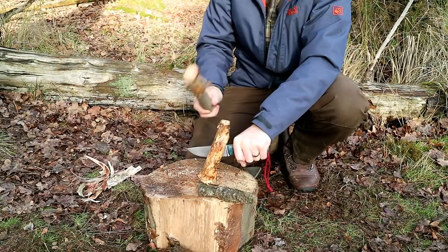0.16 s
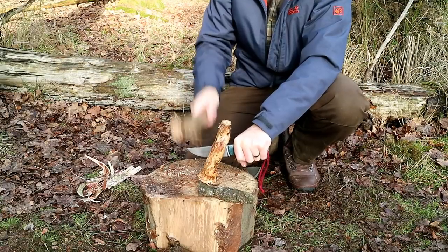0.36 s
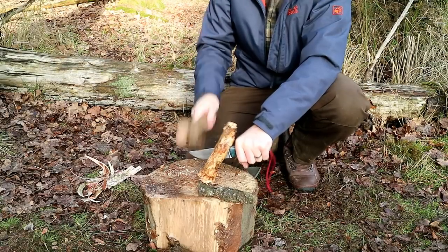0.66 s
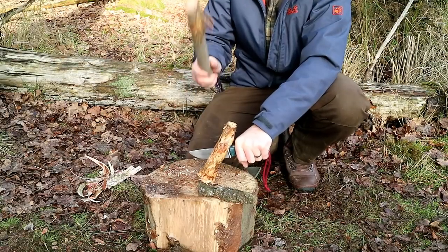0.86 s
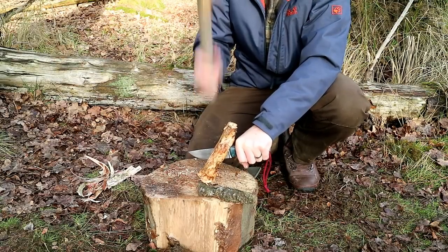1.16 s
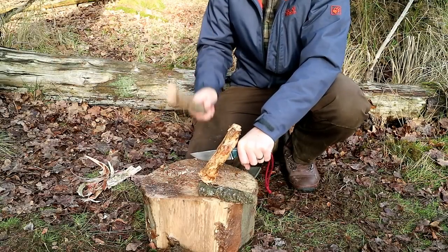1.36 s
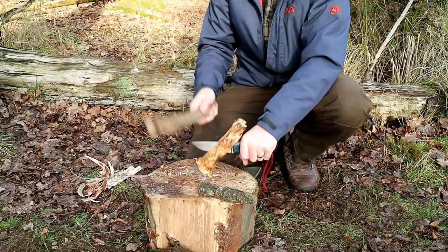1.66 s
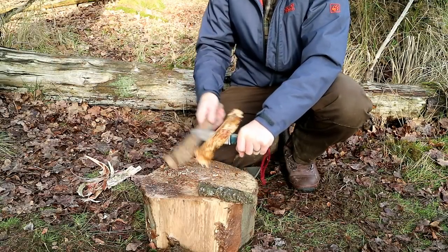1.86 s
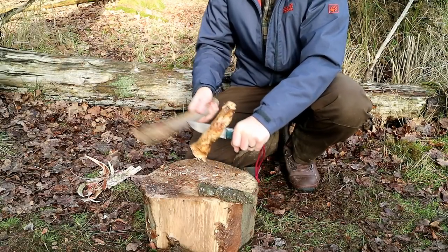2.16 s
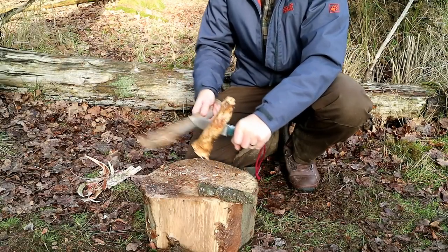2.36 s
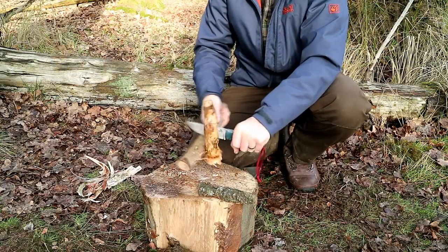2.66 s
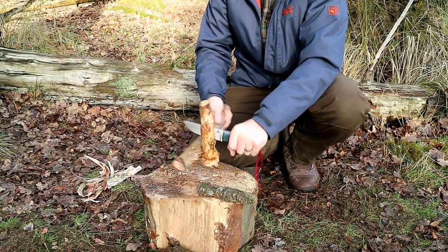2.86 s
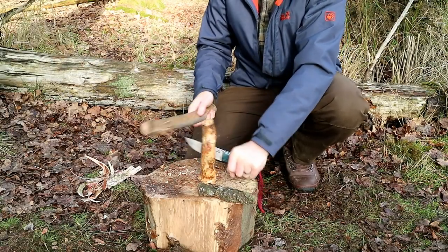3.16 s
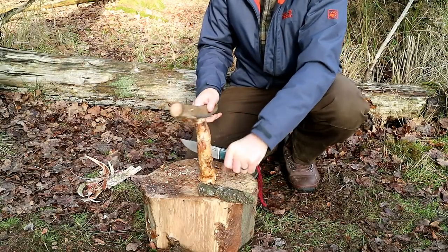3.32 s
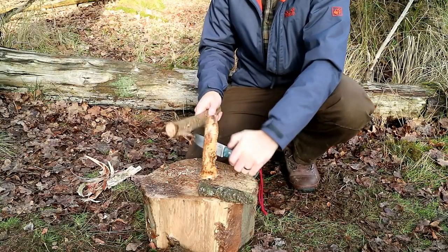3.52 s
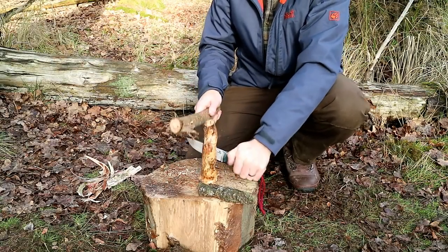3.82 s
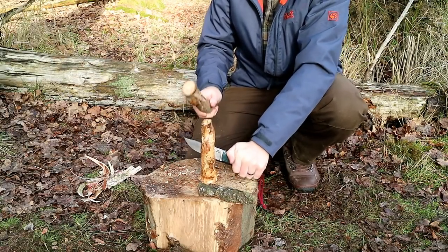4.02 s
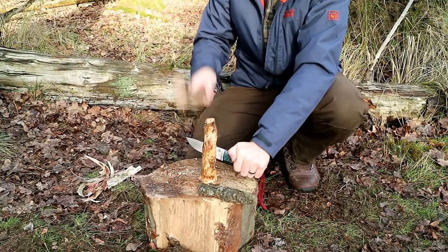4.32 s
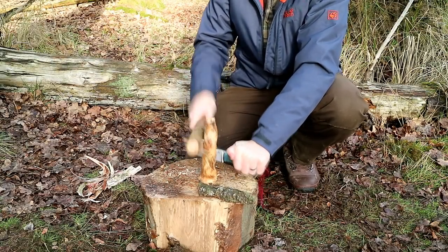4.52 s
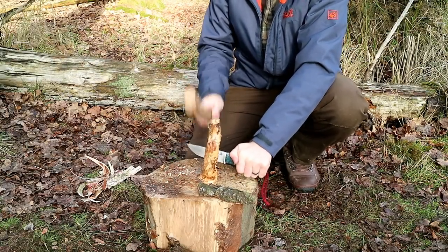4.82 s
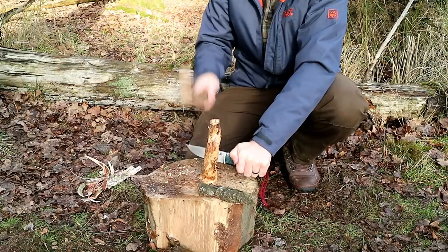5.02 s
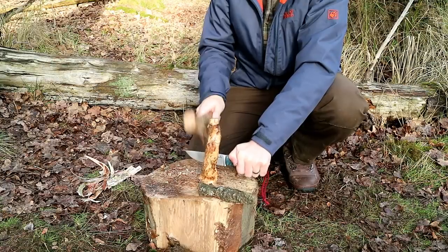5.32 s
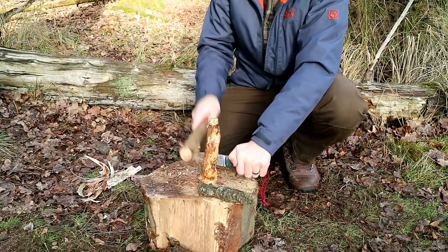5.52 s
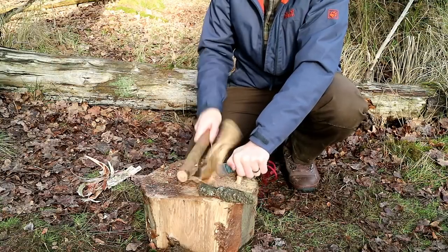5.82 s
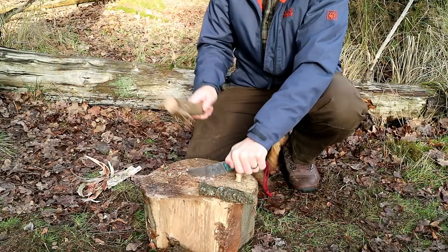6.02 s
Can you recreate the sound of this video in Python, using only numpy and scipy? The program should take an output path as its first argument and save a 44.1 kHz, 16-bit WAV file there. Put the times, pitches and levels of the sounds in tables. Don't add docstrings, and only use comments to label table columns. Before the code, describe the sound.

Firm wood-on-steel knocks with sharp cracks and short dull echoes from the trees give way to soft, rapid taps. Dry ticks and nylon rubbing fill a short pause, then the loudest knocks return, slightly clipped, ending with splintering bits. Recorded closely outdoors, nearly centred, with distant traffic rising between blows.

```python
import sys
import numpy as np
from scipy import signal
from scipy.fft import rfft, irfft, next_fast_len
from scipy.io import wavfile
from scipy.ndimage import uniform_filter1d

SR = 44100
rng = np.random.default_rng(int(sys.argv[2]) if len(sys.argv) > 2 else 0)


def invert_db(x):
    u = np.asarray(x, float) / 20
    return 10 ** u


def wav_out(sig):
    wavfile.write(sys.argv[1], SR, np.round(np.clip(np.atleast_2d(sig).T, -1, 1) * 32767).astype(np.int16))


N = 272526

# t/s, level/dB
GAIN = [(0.0, -47.5), (0.17, -51.5), (0.6, -49), (0.76, -53), (1.86, -53), (2.74, -43), (2.96, -43),
        (3.74, -34.5), (4.08, -35.5), (4.25, -38), (4.54, -37.5), (4.7, -43), (4.92, -47), (5.18, -41.5),
        (5.37, -48.5), (5.83, -47.5), (5.99, -54), (6.18, -51.5)]
FOLLOW_SLOPE = [1, 1.03, 1.1, .95]
FOLLOW_HZ = [300, 750, 2300, 5500]
# f/Hz, density/dB
ROAR = [(15, -49), (25, -21), (60, -13), (97, -15.5), (189, -15.5), (229, -9), (262, -11.5), (294, -12),
        (376, -10.5), (562, -9.5), (630, -6), (856, -2.5), (1160, -6.5), (1770, -21.5), (2400, -26.5),
        (3120, -52), (5280, -120)]
# f/Hz, density/dB
HISS = [(1530, -30), (2600, -1), (3030, -1.5), (3190, -1), (3660, -2.5), (4530, -4), (6780, -9.5),
        (8380, -2), (9540, -16.5), (12700, -6.5), (15200, -12.5), (16000, -20.5)]
# middle t/s, length/s, f/Hz, level/dB
ENGINE = [(.55, .5, 300, -56.5), (1.002, .7, 292.6, -53), (2.01, .35, 296, -60), (2.3, 0.63, 240, -53.5),
          (2.756, .3, 237.6, -59), (3.105, 0.65, 295.2, -48), (3.27, 0.37, 241, -53),
          (3.645, 0.44, 299.7, -62), (4.126, 0.455, 295.5, -53.5), (4.156, 0.56, 240.6, -54.5),
          (4.51, 0.6, 238, -57.5), (4.606, 0.22, 296, -56), (5.2, .35, 296, -59), (5.224, 0.26, 237, -64.5)]
# f/Hz, level/dB
DRONE = [(296, -65.5), (240, -70.5), (180, -74)]
# middle t/s, length/s, swish level/dB, rub level/dB
SLEEVE = [(0, .16, -61, -74), (.3, .25, -89, -65.5), (0.572, .34, -64, -61), (1.08, .16, -80, -62),
          (1.32, .28, -58, -70.5), (1.745, .25, -72, -63), (1.9, 0.16, -56.5, -75),
          (3.16, 0.32, -55.5, -72), (3.375, 0.56, -62.5, -57.5), (4.18, 0.37, -68, -56.5),
          (4.497, 0.69, -74, -60), (4.62, 0.11, -55, -63), (5.23, 0.58, -66, -75.5),
          (5.943, 0.32, -53, -71.5), (6.15, 0.11, -54, -75)]
BLOW_S = [0.0941, 0.4044, 0.7094, 1.3414, 1.9494, 2.1674, 2.3614, 2.5425, 2.7446, 2.9521, 3.1990, 4.2576,
          4.2708, 4.6782, 5.0129, 5.3310, 5.6232, 5.9178, 5.9315, 6.0965]
HOLD = [.9, 1.55, 1.05, .75, 0.81, 0.64, 1.24, 0.51, .75, 0.93, 1.3, 0.75, 1.1, .9, 0.72, 1.4, 0.91, .9,
        1.2, 1.1]
# peak level/dB, main f/Hz, upper f/Hz, upper re main/dB
WOOD = [(-8, 950, 1200, 3), (-10.5, 1277, 4720, -10.5), (9.5, 1638, 2529, -.5), (3.5, 1628, 2544, -7),
        (-24, 2300, 2480, 2.5), (-22.5, 2230, 3960, 14), (-25.5, 2350, 3540, 9.5), (-27, 2500, 3570, 3),
        (-21.5, 1110, 2680, 12.5), (-24.5, 1200, 2970, 14), (-24.5, 1130, 3770, 3.5), (-4, 1400, 2975, 7.5),
        (-14.5, 1510, 3584, -6), (15, 1983, 1300, -3), (-15.5, 1800, 2640, 7), (9, 2055, 3500, -3),
        (-23, 1510, 3030, 3.5), (9.5, 1990, 3004, 4), (-19, 2100, 4700, -2), (-32, 1280, 2860, -7)]
# ping level/dB, mode f/Hz, rattle level/dB
BLADE = [(-2.5, 18000, 7), (-20, 1700, -21), (-8.5, 6600, 4), (-5.5, 6940, 0.5), (-8.5, 7630, -13),
         (-8.5, 7560, -13.5), (-8.5, 2700, -13.5), (-13, 16000, -7), (-9.5, 22000, -9.5),
         (-14.5, 4700, -19), (-20.5, 6950, -11.5), (0, 4200, -3), (-19.5, 8380, -12), (5, 6590, 9.5),
         (-14.5, 7700, -6.5), (-6.5, 3600, 7.5), (-28.5, 5000, -22.5), (4, 8110, 9), (-7, 2400, -16.5),
         (-44, 7700, -26)]
# thud level/dB, branch f/Hz, branch re thud/dB, ground hum level/dB
STUMP = [(-10.5, 790, -11.5, -43), (-16, 1113, -0.5, -49), (-16.5, 1100, 10.5, -47.5), (-13, 883, 5, -49.5),
         (-32.5, 566, -2, -66), (-29.5, 620, -2.5, -72), (-28, 1085, -3, -62), (-25, 950, -18, -64.5),
         (-24.5, 1100, 10, -64), (-28, 640, 0.5, -55), (-14.5, 1800, -12, -40), (-40, 1000, 22.5, -57.5),
         (-30.5, 660, 4.5, -41), (-5.5, 700, 5, -40), (-12, 1010, -13, -41.5), (-11.5, 1350, 7.5, -43.5),
         (-26, 780, -1, -45), (-17, 870, 6, -77), (-25, 790, -1, -79), (-36, 693, 8, -52)]
# t/s, peak level/dB, f/Hz
JOLTS = [
    (0.096, -31, 90),
    (0.71, -27, 81.5),
    (4.676, -19, 90),
    (5.011, -40, 70),
    (5.331, -27.5, 90),
    (5.918, -42.5, 148),
]
# t/s, peak level/dB, centre f/Hz, t60/s
TICKS = [(0.0958, -5.5, 4970, .01), (.354, -45.5, 1100, 0.023), (.4155, -38, 5000, 0.012),
         (.786, -51, 6000, .015), (1.342, -9, 12500, 0.011), (1.385, -45, 12000, .012),
         (2.218, -40, 8300, .018), (2.458, -55, 4000, .015), (3.197, -20, 2260, 0.018),
         (3.352, -33.5, 3700, 0.16), (3.415, -35, 12500, .011), (3.432, -32.5, 9000, .011),
         (3.539, -30.5, 7500, 0.019), (3.547, -26.5, 3440, 0.043), (3.574, -28, 3330, 0.036),
         (3.691, -30, 2400, .02), (3.841, -22, 2720, 0.0105), (3.894, -32, 4470, 0.015),
         (3.95, -30.5, 7000, 0.0079), (4.2609, 3, 11400, 0.0029), (4.268, -18, 4500, .01),
         (4.6841, 5.5, 1770, 0.0037), (4.725, -28, 1410, 0.013), (4.787, -30, 4130, .013),
         (5.066, -41, 4500, .012), (5.335, 0.5, 3130, 0.01), (6.042, -32, 1810, 0.046),
         (6.081, -32, 7800, 0.055), (6.154, -25.5, 8440, .033), (6.175, -30.5, 4000, 0.035)]

RUB_HZ = 3580
RING_T60_S, PING_T60_S, RATTLE_T60_S = 0.0094, 0.012, 0.022
FIZZ_DB, TOP_FIZZ_DB = -1.5, -19
STUMP_HZ, STUMP_LOW_HZ, STUMP_LATE_S = 364, 201, 0.00063
STUMP_LOW_DB, STUMP_LOW_SLOPE = -16.5, -0.7
TICK_BROAD = 0.45
ECHO_DB, ECHO_LATE_S, ECHO_T60_S, ECHO_SLOPE = -55.5, 0.022, 0.29, 0.62
HAZE_STEP_S, HAZE_START_S = 1024 / 48000, 0.0068
HAZE_DB, HAZE_SLOPE, HAZE_TONE = -39, 0.7, 0.6
TOP_HZ = 15800


def sound_at(out, s, burst):
    i = int(s * SR)
    end = i + len(burst)
    return np.concatenate([out[:i], out[i:end] + burst[:N - i], out[end:]])


def fade(t, t60_s, rise_s):
    rise = 1 - np.exp(-t / max(rise_s, 1e-5))
    shape = rise * np.exp(-np.log(1000) * t / max(t60_s, 1e-3))
    return shape / shape.max()


def swell(s, length_s):
    return np.cos(np.pi * np.clip((np.arange(N) / SR - s) / length_s, -.5, .5)) ** 2


def ring(t, hz, t60_s, rise_s, split, chance):
    tone = np.sin(2 * np.pi * hz * t)
    for sign, c in zip((-1, 1), chance):
        near_hz = hz * (1 + sign * split * (.5 + c))
        tone = tone + 0.41 * np.sin(2 * np.pi * (near_hz * t + c))
    return tone * fade(t, t60_s, rise_s)


def band(x, lo_hz, hi_hz, order=2):
    sos = signal.butter(order, [lo_hz, min(hi_hz, .45 * SR)], "bandpass", fs=SR, output="sos")
    y = signal.sosfilt(sos, x)
    return y / np.sqrt(np.mean(y ** 2))


def highpass(x, hz, order=2):
    return signal.sosfilt(signal.butter(order, hz, "highpass", fs=SR, output="sos"), x)


def walk(rate_hz):
    k = int(SR / rate_hz)
    steps = np.repeat(rng.standard_normal(N // k + 1), k)
    return 1.4 * uniform_filter1d(uniform_filter1d(steps, k), k)[:N]


def camera_gain_db():
    db = np.interp(np.arange(N) / SR, *np.transpose(GAIN))
    return db - db.mean()


def road():
    gain_db = camera_gain_db()
    table = np.vstack([ROAR[:-2], np.array(HISS[1:]) + [0, -28]])
    size = next_fast_len(N)
    log_hz = np.log(np.arange(size // 2 + 1) * SR / size + 1)
    colour = invert_db(np.interp(log_hz, np.log(table[:, 0]), table[:, 1]))
    width = np.interp(log_hz, np.log([30, 100, 500, 4000, 14000]), [.1, .18, .1, .3, .63])
    mid, side = rfft(rng.standard_normal((2, size))) * colour
    pair = np.array([mid + width * side, mid - width * side])
    out = 0
    for hz in 20 * 2 ** np.arange(0, 10, .4):
        octaves = (log_hz - np.log(hz)) / np.log(2)
        share = np.cos(np.pi / 2 * np.clip(octaves / .4, -1, 1)) ** 2
        follow = np.interp(np.log(hz), np.log(FOLLOW_HZ), FOLLOW_SLOPE)
        flicker_db = 1.2 * walk(12) + 1.2 * walk(3)
        out = out + invert_db(follow * gain_db + flicker_db - 25) * irfft(pair * share, size)[:, :N]
    turn_s = np.cumsum(1 + .003 * walk(6)) / SR
    flutter_db = 3.2 * walk(12)
    lines = np.zeros(N)
    for s, length_s, hz, db in ENGINE:
        lines = lines + invert_db(db) * swell(s, length_s) * np.sin(2 * np.pi * hz * turn_s)
    for hz, db in DRONE:
        lines = lines + invert_db(db + 3.6 * walk(4.3)) * np.sin(2 * np.pi * hz * turn_s)
    return out + invert_db(gain_db + flutter_db) * lines


def sleeve():
    swish = sum(invert_db(db) * swell(s, length_s) for s, length_s, db, _ in SLEEVE)
    rub = sum(invert_db(db) * swell(s, length_s) for s, length_s, _, db in SLEEVE)
    n = rng.standard_normal((4, N))
    broad = band(n[0] + .2 * n[1:3], 1700, 5500, order=1)
    broad = broad + .45 * band(n[0] + .3 * n[1:3], 7000, 9500)
    broad = broad + .25 * band(n[0] + .6 * n[1:3], 11000, 15000)
    slow = signal.sosfilt(signal.butter(2, 170, fs=SR, output="sos"), n[3] + 1j * n[0])
    turns = np.cumsum(RUB_HZ * (1 + .015 * walk(6.4))) / SR
    thin = np.real(slow / slow.std() * np.exp(2j * np.pi * turns))
    return invert_db(camera_gain_db()) * (swish * invert_db(1.5 * walk(25)) * broad + rub * thin)


def wood():
    out, t = np.zeros(N), np.arange(4096) / SR
    chance = rng.random((len(WOOD), 4))
    for s, hold, (db, hz, up_hz, up_db), c in zip(BLOW_S, HOLD, WOOD, chance):
        main = ring(t, hz, hold * RING_T60_S, 0.00047, 0.18, c[:2])
        upper = ring(t, up_hz, 0.85 * hold * RING_T60_S, 0.00011, 0.14, c[2:])
        out = sound_at(out, s, invert_db(db - 1.5) * (main + invert_db(up_db) * upper))
    return out


def crack():
    out, t = np.zeros(N), np.arange(2048) / SR
    chance = rng.random((len(BLADE), 2))
    noise = rng.standard_normal((len(BLADE), 2, len(t)))
    for s, hold, (db, hz, _), c, n in zip(BLOW_S, HOLD, BLADE, chance, noise):
        ping = ring(t, hz, hold * PING_T60_S, 0.00037, 0.044, c)
        fizz = invert_db(FIZZ_DB) * band(n[0], 3100, 9500) + invert_db(TOP_FIZZ_DB) * band(n[1], 10500, 15000)
        fizz = fizz * fade(t, 0.87 * hold * PING_T60_S, 0.0001)
        out = sound_at(out, s, invert_db(db - 9.5) * (ping + fizz))
    return out


def rattle():
    out, t = np.zeros(N), np.arange(2048) / SR
    noise = band(rng.standard_normal((len(BLADE), len(t))), 1700, 3700, order=1)
    for s, hold, (*_, db), n in zip(BLOW_S, HOLD, BLADE, noise):
        shape = fade(t, RATTLE_T60_S, 0.00028) * np.exp(-(t / (0.0092 * hold)) ** 2)
        out = sound_at(out, s, invert_db(db - 11.5) * n * shape)
    return out


def stump():
    out, t = np.zeros(N), np.arange(24000) / SR
    chance = rng.random((len(STUMP), 4))
    first = np.sin(np.pi * np.clip((t - .02) / .3, 0, 1)) ** .9
    second = .25 * np.sin(np.pi * np.clip((t - .3) / .24, 0, 1))
    hum = (first + second) * np.sin(2 * np.pi * (71 * t + 12 * .07 * np.exp(-t / .07)))
    for s, (db, branch_hz, branch_db, hum_db), c in zip(BLOW_S, STUMP, chance):
        low_db = STUMP_LOW_DB + STUMP_LOW_SLOPE * (db + 13)
        thud = ring(t, STUMP_HZ, 0.022, 0.0015, .25, c[:2])
        thud = thud + invert_db(low_db) * ring(t, STUMP_LOW_HZ, .02, 0.00029, 0.34, c[:2])
        thud = thud + invert_db(branch_db + 1) * ring(t, branch_hz, 0.024, 0.00048, 0.14, c[2:])
        out = sound_at(out, s + STUMP_LATE_S, -invert_db(db - 2) * highpass(thud, 150))
        out = sound_at(out, s, invert_db(hum_db - 5.5) * hum)
    for s, db, hz in JOLTS:
        out = sound_at(out, s, invert_db(db) * np.sin(2 * np.pi * hz * t) * fade(t, 0.045, 0.001))
    return out


def ticks():
    out, t = np.zeros(N), np.arange(8192) / SR
    noise = rng.standard_normal((len(TICKS), len(t)))
    for (s, db, hz, t60_s), n in zip(TICKS, noise):
        crackle = (1 - TICK_BROAD) * band(n, hz / 1.4, hz * 1.19)
        grain = crackle + TICK_BROAD * band(n, 450, 8000, order=1)
        out = sound_at(out, s, invert_db(db - 6) * grain * fade(t, t60_s, 0.0005))
    return out


def trunks():
    t, blows = np.arange(SR // 2) / SR, np.zeros(N)
    wood_db = np.minimum(np.array(WOOD)[:, 0], 8)
    rattle_db = np.array(BLADE)[:, 2]
    blows[(np.array(BLOW_S) * SR).astype(int)] = invert_db(ECHO_SLOPE * wood_db + 0.62 * rattle_db)
    noise = rng.standard_normal((3, len(t)))
    shape = invert_db(ECHO_DB) * fade(np.maximum(t - ECHO_LATE_S, 0), ECHO_T60_S, 0.0066)
    sides = []
    for own in noise[1:]:
        tail = band(noise[0] + .25 * own, 1200, 2500, order=1)
        tail = tail + .3 * band(noise[0] + .4 * own, 2600, 8500)
        sides.append(signal.fftconvolve(blows, shape * tail)[:N])
    return np.array(sides)


def haze():
    mid, side, tone = rng.standard_normal((3, N))
    mid = band(mid, 420, 5000, order=1) + .5 * band(mid, 4700, 13000, order=1)
    broad = mid + .3 * band(side, 8000, 15500, order=1) * np.array([[1], [-1]])
    out = 0
    for s, (*_, db), (_, hz, *_) in zip(BLOW_S, BLADE, WOOD):
        edge_s = HAZE_START_S + HAZE_STEP_S * np.floor((s - HAZE_START_S) / HAZE_STEP_S)
        size = 0
        for middle_s in (edge_s, edge_s + HAZE_STEP_S):
            weight = abs(np.cos(np.pi / 2 * (s + 0.0011 - middle_s) / HAZE_STEP_S))
            size = size + weight * swell(middle_s, 2 * HAZE_STEP_S) ** .45
        colour = broad + HAZE_TONE * band(tone, hz / 1.12, hz * 1.12, order=1)
        out = out + invert_db(HAZE_DB + HAZE_SLOPE * db) * size * colour
    return out


def scene():
    blows = highpass(rattle() - wood() - crack(), 300)
    ports = .23 * np.array([np.roll(blows, 13), np.roll(blows, 11)])
    thud = stump()
    thud_side = .07 * np.roll(thud, 30) * np.array([[1], [-1]])
    knocks = 0.98 * np.roll(blows, 12) + ports + thud + thud_side
    lean = invert_db(np.array([[-.25], [.25]]))
    return lean * (knocks + ticks() + trunks() + road() + sleeve())


def top_cut(x):
    return signal.sosfilt(signal.butter(12, 16440, fs=SR, output="sos"), x)


def record(dry):
    cut = signal.sosfilt(signal.ellip(10, .2, 100, TOP_HZ, fs=SR, output="sos"), dry)
    hard = np.clip(cut, -.86, .86) + haze()
    hard = highpass(hard, 40, order=1)
    hard = signal.sosfilt(signal.ellip(8, .5, 90, 16350, fs=SR, output="sos"), hard)
    return top_cut(hard)


dry = scene()
out = record(dry)
wav_out(out)
```